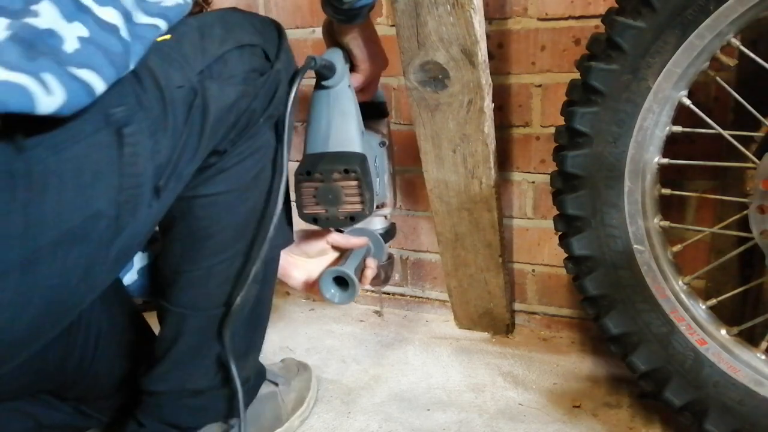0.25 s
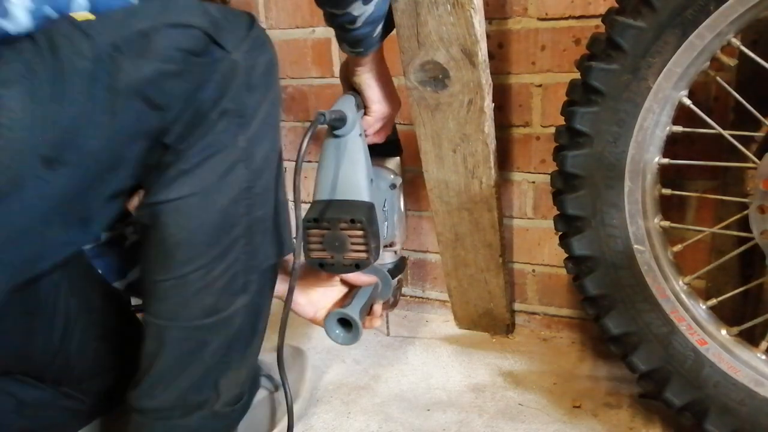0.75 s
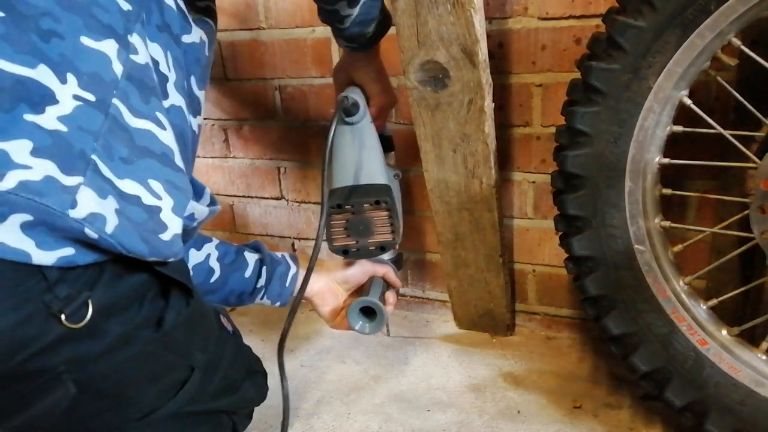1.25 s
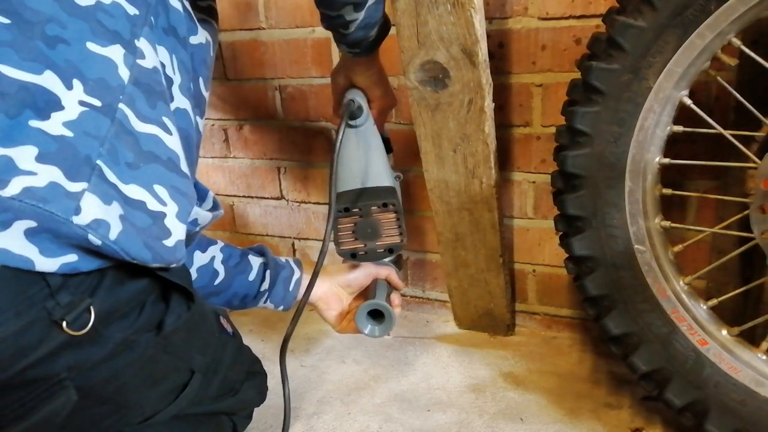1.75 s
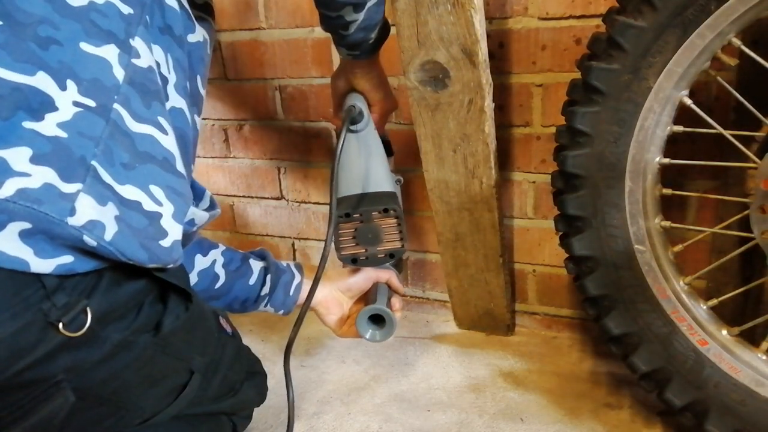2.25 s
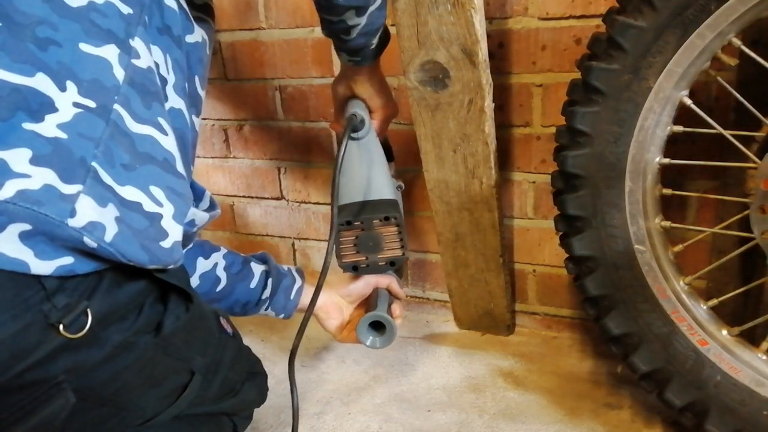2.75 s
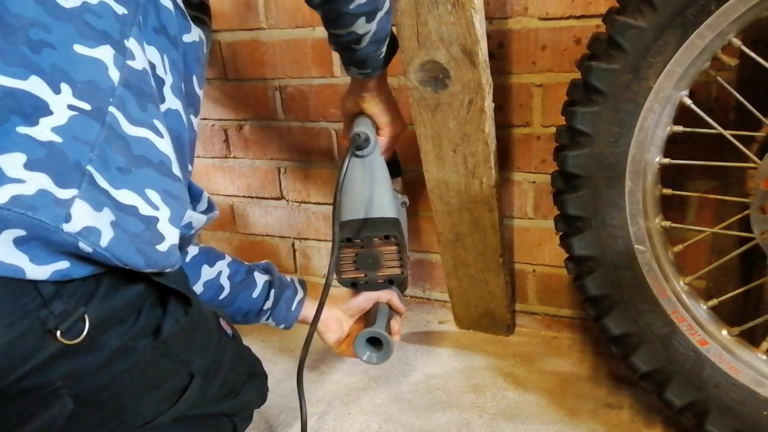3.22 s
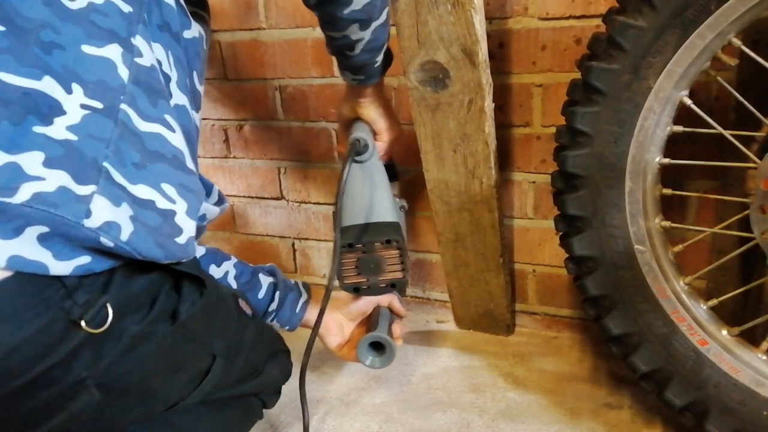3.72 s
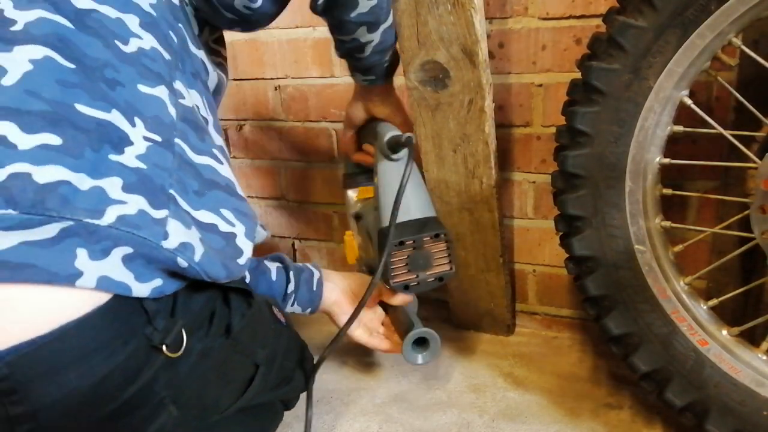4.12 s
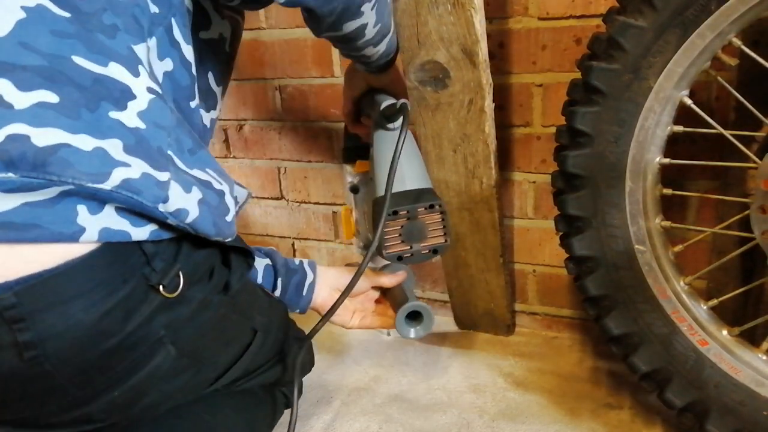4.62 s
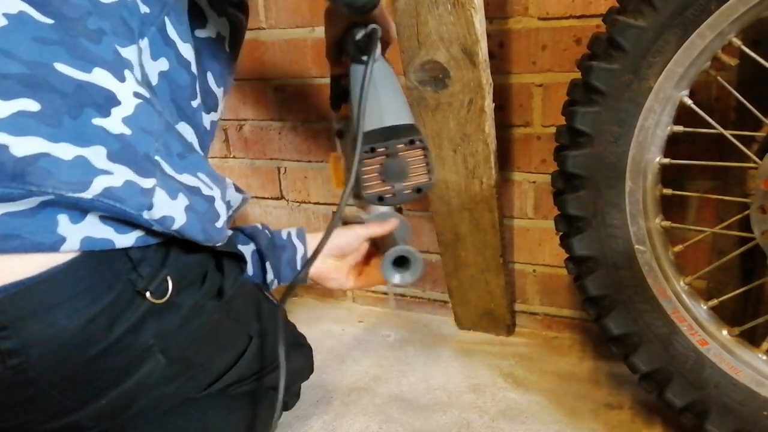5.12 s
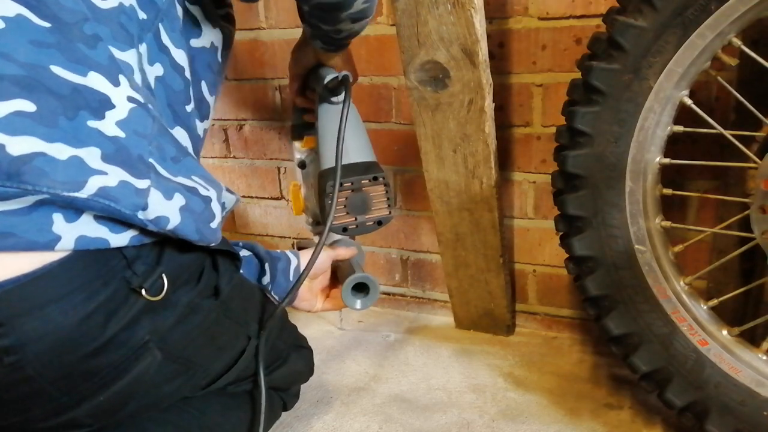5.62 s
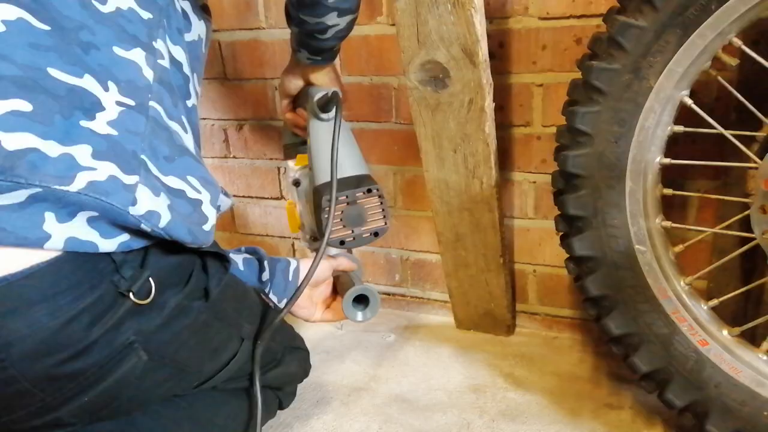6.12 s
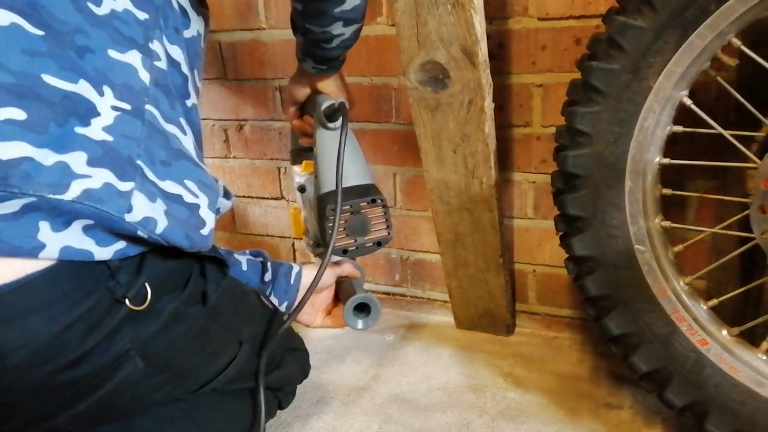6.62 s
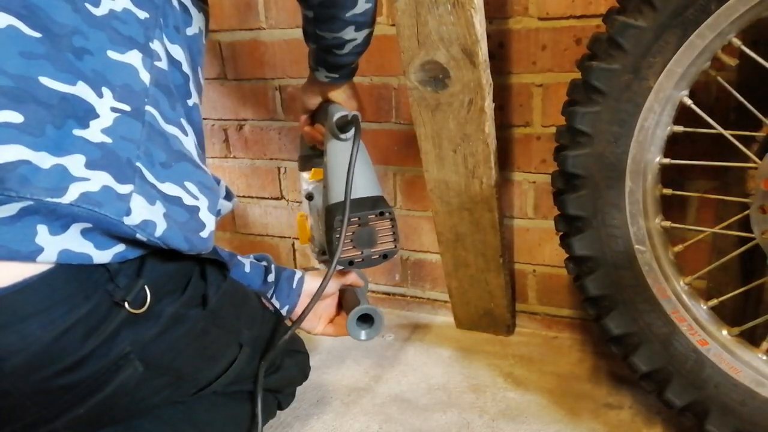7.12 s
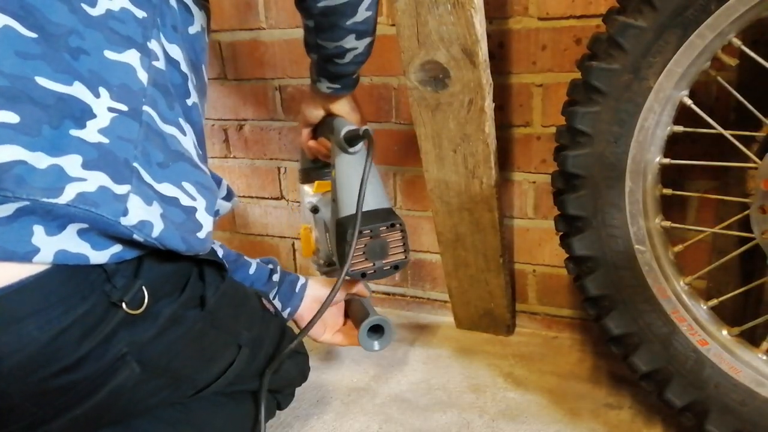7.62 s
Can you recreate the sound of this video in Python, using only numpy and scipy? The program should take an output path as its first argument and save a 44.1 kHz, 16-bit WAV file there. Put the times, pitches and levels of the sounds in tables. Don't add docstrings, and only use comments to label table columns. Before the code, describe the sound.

Cloth rustle and a few knocks on concrete, then a corded hammer drill hammers in short surging pulls, lifts to coast down, and bores again.

```python
import sys
import numpy as np
from scipy import signal
from scipy.fft import rfft, irfft, next_fast_len
from scipy.io import wavfile
from scipy.ndimage import uniform_filter1d, map_coordinates

SR = 44100
rng = np.random.default_rng(int(sys.argv[2]) if len(sys.argv) > 2 else 0)


def boost_factor(decibels):
    exponent = np.asarray(decibels, float) / 20
    return 10 ** exponent


def unload_audio(sound):
    columns = np.transpose(np.atleast_2d(sound))
    steps = np.round(np.clip(columns, -1, 1) * 32767)
    wavfile.write(sys.argv[1], SR, steps.astype(np.int16))


N = 346758


def unit(x):
    return x / np.sqrt(np.mean(x ** 2) + 1e-20)


def along(points, hz):
    f, v = np.transpose(points)
    return np.interp(np.log(hz + 1), np.log(f + 1), v)


def wobble(rate):
    at = np.arange(0, N + 16, 8)
    knots = rng.standard_normal(int(N * rate / SR) + 4)
    return np.interp(np.arange(N), at, map_coordinates(knots, [at * rate / SR]))


def filtered(x, response):
    m = next_fast_len(N + SR // 2)
    return irfft(rfft(x, m) * response(np.fft.rfftfreq(m, 1 / SR)), m)[..., :N]


def causal(x, points):
    cep = irfft(np.log(boost_factor(along(points, np.fft.rfftfreq(4096, 1 / SR))) + 1e-4))
    cep[1:2048] *= 2
    cep[2049:] = 0
    return signal.fftconvolve(x, irfft(np.exp(rfft(cep))))[:N]


def hiss(points):
    return unit(filtered(rng.standard_normal(N), lambda hz: boost_factor(along(points, hz))))


def ringing(hz, peaks):
    f = np.arange(0, 12000, 1.5)
    total = sum(boost_factor(db) * 1j * f * w / (c * c - f * f + 1j * f * w) for c, w, db in peaks)
    return np.interp(hz, f, total)


def dying(x, seconds):
    return signal.lfilter([1], [1, -np.exp(-1 / (seconds * SR))], x)


def stroke_gain(rows):
    t = np.arange(0, N + 40, 20) / SR
    total = sum(boost_factor(db - 20 * np.maximum((s - t) / rise, (t - s) / fall)) for s, rise, fall, db in rows)
    return np.interp(np.arange(N) / SR, t, total)


# (frequency [Hz], level per Hz [dB])
CLOTH = [(710, -40), (1200, -11.5), (1570, -21), (1980, -11), (2870, -3), (4160, -16.5), (7320, -9),
         (8560, -24.5), (11000, -29), (14300, -55), (22000, -120)]
SCUFF = [(290, -76), (500, -46), (739, -19), (1630, -8), (2300, -8), (3600, -18), (5200, -11), (7450, -2),
         (13300, -2), (15800, -4)]
GRIT = [(530, -50), (900, -19), (1220, -10), (1640, -9), (2820, -10.5), (4070, -9.5), (6180, -6.5),
        (7540, -1), (11000, -13), (14300, -40.5), (22000, -120)]
GRIND = [(150, -67), (250, -37), (771, 0), (941, -16), (1340, -6), (1820, -14), (2280, -19), (3500, -34),
         (4550, -64), (7700, -120)]
# (frequency [Hz], level per Hz [dB])
FIZZ = [(5590, -5.5), (9500, 0), (10500, 4), (13000, 18), (13900, 16.5), (15700, 18), (16300, 10)]
VENTS = [(6200, -120), (6700, -14.5), (7300, -3), (7900, -8), (8600, -19), (9000, -120)]
# (loudest [s], 20 dB rise
# [s], 20 dB fall [s], level [dB], fizz over it [dB])
RUSTLES = [(0, .01, .065, -48, -11), (.40, .05, .05, -53, -6), (.435, .07, .095, -46, -25),
           (.745, .05, .006, -70, 9), (.751, .002, .03, -42.5, -1.5), (.77, .01, .3, -61, 2),
           (.852, .006, .03, -48, -1.5), (.885, .0015, .06, -37, 3), (.91, .02, .06, -42, 3),
           (1.016, .004, .05, -56, -15), (1.03, .015, .06, -52, -4), (1.048, .004, .06, -43, -12),
           (1.064, .006, .04, -44, -8), (1.085, .05, .08, -42, -8), (1.11, .03, .05, -45, -15),
           (1.177, .002, .09, -37, -3), (1.207, .001, .008, -50, 20), (1.222, .001, .01, -48, 21),
           (1.24, .001, .01, -45, 21), (5.873, .001, .16, -39, -7), (5.9, .022, .04, -38, -12),
           (5.747, .004, .02, -45, -9), (5.769, .002, .02, -47, -12), (5.79, .01, .2, -63, 0)]
# (loudest [s], 20 dB rise [s], 20 dB fall [s], level [dB])
GRINDS = [
    (.01, .03, .08, -47),
    (.42, .12, .11, -56),
    (.751, .002, .06, -37),
    (.852, .01, .05, -49),
    (.885, .002, .008, -37),
    (.91, .012, .05, -42),
    (.926, .035, .045, -35),
    (.936, .01, .03, -40),
    (5.745, .002, .04, -46),
    (5.769, .002, .1, -51),
]
# (time [s], peak level [dB])
FIRST_BLOWS = [(1.258, -21), (1.28, -20), (1.3044, -24), (1.3324, -25), (1.3643, -27), (1.4042, -23),
               (1.4311, -22)]


def drag():
    t = np.arange(N) / SR
    shoe = np.where(t < 1.046, hiss(VENTS), hiss(SCUFF))
    rubbed = np.select([t < .75, (t > 1) & (t < 1.17)], [hiss(CLOTH), shoe], hiss(GRIT))
    grain = boost_factor(2.6 * wobble(220))
    rub_gain = stroke_gain([row[:4] for row in RUSTLES])
    dust_gain = stroke_gain([(s, rise, fall, db + fizz_db) for s, rise, fall, db, fizz_db in RUSTLES])
    crest_db = 7
    dust_gain += stroke_gain([(s + .001, .001, .011, db - crest_db) for s, db in FIRST_BLOWS])
    return grain * (rub_gain * rubbed + stroke_gain(GRINDS) * hiss(GRIND) + dust_gain * hiss(FIZZ))


# (frequency [Hz], level per Hz [dB])
QUIET = [(76, -51), (130, -17), (176, -6), (248, -11), (304, -7), (437, -13), (579, -14), (1410, -24),
         (4200, -27), (14900, -31), (16200, -33)]
RUMBLE = [(13, -40), (22, -11), (54, -9.5), (81, -9), (110, -12.5), (140, -34.5), (240, -120)]
SEEP = [(3600, -40), (4600, -10), (5400, 0), (7600, -3), (8600, -22), (11000, -120)]
# (time [s], level [dB])
GAIN = [(0, 4), (.15, 0), (.7, -2.5), (.85, -5), (1.5, -18), (4.3, -22), (4.6, -22), (5.6, -13), (6.2, -23),
        (7.86, -22)]


def background():
    t = np.arange(N) / SR
    gain_db = np.interp(t, *np.transpose(GAIN))
    air = boost_factor(-62.5 + gain_db + .5 * wobble(3.4)) * hiss(QUIET)
    shake = boost_factor(-67 + 1.3 * gain_db + 2 * wobble(10)) * hiss(RUMBLE)
    seep = boost_factor(-67) * np.clip((.69 - t) / .15, 0, 1) ** .3 * hiss(SEEP)
    return air + shake + seep


# (time [s], peak level [dB], frequency [Hz], length [s])
STEPS = [
    (.222, -39.5, 58, .12),
    (.549, -43, 150, .025),
    (.598, -46, 150, .025),
    (1.1, -42, 150, .05),
    (5.79, -53, 150, .07),
]
# (time [s], peak level [dB], click level [dB], 60 dB decay [s], click frequency [Hz])
KNOCKS = [(0.341, -54, -56, 0.06, 6370), (0.75, -11, -33, 0.1, 2000), (0.775, -23, -57, 0.052, 2830),
          (0.804, -34.5, -63, 0.18, 2720), (0.851, -40, -46, 0.066, 3480), (0.884, -52, -30, 0.06, 2550),
          (0.984, -46, -52.5, 0.06, 3870), (1.104, -55, -40.5, 0.06, 3700), (1.064, -70, -44, .05, 7700),
          (1.078, -70, -45, .05, 7000), (1.089, -70, -44, .05, 7000), (1.176, -60, -34, .05, 5000),
          (1.404, -60, -36, .05, 9000), (.403, -70, -52, .05, 2340), (.431, -70, -48, .05, 2900),
          (5.872, -65, -38, .05, 4500), (1.198, -28, -27, 0.085, 2840), (5.743, -47, -52, 0.075, 8700),
          (5.767, -29, -44, 0.079, 8473), (5.79, -31, -62, 0.055, 8480), (5.829, -42, -60, 0.078, 3246)]
# (frequency [Hz], level per Hz [dB])
HOLLOW = [(53, -57), (90, -29.5), (197, 0.5), (449, -12), (601, -5), (1060, -36), (1460, -24),
          (2910, -37.5), (3500, -56), (4550, -81.5), (7700, -120)]


def knocks():
    low, out = np.zeros(N + SR), np.zeros(N + SR)
    t = np.arange(SR // 4) / SR
    for s, db, click_db, t60, hz in KNOCKS:
        at = round(s * SR)
        rattle, tick = rng.standard_normal((2, len(t)))
        rattle[0] = 7
        low[at:][:len(t)] += boost_factor(db + 11.5 - 60 * t / t60) * rattle
        click = signal.lfilter(*signal.iirpeak(hz, 1.6, SR), tick)
        out[at:][:len(t)] += click * boost_factor(click_db + 11.5 - 60 * t / .026)
    for s, db, hz, length in STEPS:
        swell = (1 - np.exp(-t / .004)) * np.exp(-(t / length) ** 2 * 1.5)
        out[round(s * SR):][:len(t)] += boost_factor(db) * swell * np.sin(2 * np.pi * hz * t)
    return out[:N] + causal(low[:N], HOLLOW)


HALT = 16.5
# (from [s], to [s])
LIFTED = (4.378, 5.872)
# (time [s], held [s], speed aimed at [blows/s], pressure on the bit [dB], squeal over the motor [dB])
PULLS = [(1.176, .075, 55, 4, -20), (1.408, .092, 74, 2.5, -7), (1.64, .072, 82, 1.5, -5),
         (1.843, .075, 109, .3, -2), (2.065, .12, 119, -1.3, -4), (2.335, .12, 121, -.7, -5),
         (2.555, .165, 137, .3, -5), (2.86, .145, 137, -.3, -6), (3.11, .265, 139, .3, -6),
         (3.555, .155, 135, .7, -5), (3.81, .125, 131, -.7, -9), (4.19, .087, 89, -2.5, -1.5),
         (4.33, .092, 139, -3.5, -1.5), (4.50, .068, 142, .3, -7), (4.81, .06, 131, .3, -3),
         (5.872, .056, 69, -1.5, -3), (6.03, .1, 101, -2.2, -4), (6.262, .13, 137, -.7, -6),
         (6.60, .12, 98, -1.3, -3.5), (6.84, .08, 113, .3, -3), (6.99, .105, 126, 1, -4),
         (7.205, .11, 127, 1.5, -5), (7.46, .15, 108, -1.3, -1), (7.675, .08, 120, -.7, -1)]


def throttle():
    kick, spin_up_s = 36, .125
    t = np.arange(N + 1) / SR
    sag_s = np.where((t > LIFTED[0]) & (t < LIFTED[1]), .38, .3)
    speed = np.full(N + 1, HALT)
    current, lag, press_db = np.zeros((3, N + 1))
    starts = [round(row[0] * SR) for row in PULLS]
    for (s, held, aim, db, _), i, j in zip(PULLS, starts, starts[1:] + [N]):
        part = slice(i, j + 1)
        age = np.abs(t[part] - s)
        start = max(speed[i], kick)
        climb_left = np.maximum(1 - age / min(held, spin_up_s), 0) ** 1.5
        up = aim + (start - aim) * climb_left
        speed[part] = up * np.exp(-np.cumsum((age > held) / sag_s[part] / SR))
        flowing = 1 - (1 - current[i]) * np.exp(-age / .022)
        current[part] = flowing * np.exp(-np.maximum(age - held, 0) / .055)
        lag[part] = (aim - up) / aim
        press_db[part] = db
    return speed[:N], current[:N], lag[:N], uniform_filter1d(press_db[:N], size=900)


def trigger():
    late_s = .016
    out, t = np.zeros(N + SR, complex), np.arange(SR // 8) / SR
    for s, *_, db in PULLS:
        hz = 7900 - 3100 * np.exp(-t / .03)
        swell = (1 - np.exp(-t / .006)) * np.exp(-(t / .05) ** 2)
        squeal = boost_factor(db) * swell * np.exp(2j * np.pi * np.cumsum(hz) / SR)
        out[round((s + late_s) * SR):][:len(t)] += squeal
    return (out[:N] * boost_factor(2.5 + 1.2 * wobble(120)) * np.exp(1.5j * wobble(500))).real


def loudness(law, speed, current, lag, press_db, free):
    top_db, halving_db, current_db, surge_db, stall_db, stall_free_db, free_db, share = law
    full, stall_speed = 145, 40
    drive = current * (current_db * np.maximum(1 - speed / full, 0) + surge_db * lag) + share * press_db
    stall = np.where(free, stall_free_db, stall_db) * (stall_speed / speed) ** 2.2
    stall += 11 * (HALT / speed) ** 6.5
    lifted_db = free_db * uniform_filter1d(free * 1., size=400)
    return top_db + halving_db * np.log2(speed / full) + drive - stall + lifted_db


def strikes(turns, slack):
    stroke = turns + (.004 + .048 * slack) * wobble(110)
    at = np.flatnonzero(np.diff(np.floor(stroke)) > 0)
    blows = np.zeros(N)
    blows[at] = boost_factor(np.clip(rng.standard_normal(len(at)), -3, 1.2) * (1.3 + .4 * slack[at]))
    return blows


# (frequency [Hz], width [Hz], level [dB])
SLAB = [(151, 11, 2), (182, 11, 9), (214, 20, 9), (301, 74, -11), (410, 18, 8), (516, 30, 5), (558, 20, 4),
        (630, 18, 12.5), (760, 20, 14), (899, 30, 14.5), (978, 30, 11), (1199, 14, 14.5), (1420, 23, 14.5),
        (1486, 20, 12), (1570, 9, 13.5), (1820, 35, 8.5), (2128, 25, 11), (2320, 30, 13), (2470, 40, 8),
        (2566, 27, 12)]
# (frequency [Hz], width [Hz], depth [0-1])
NOTCHES = [(165, 6, .5), (200, 5, .5), (330, 8, .5), (375, 12, .75), (475, 18, .55), (1065, 40, .65),
           (1270, 30, .5), (1530, 20, .85), (1680, 16, .55), (1970, 45, .55), (2375, 22, .5)]


def slab(hz):
    cancel = np.prod([1 - depth * np.exp(-((hz - c) / w) ** 2) for c, w, depth in NOTCHES], axis=0)
    return (np.minimum(hz / 125, 1) ** 6 * 1.3 + .6 * ringing(hz, SLAB)) * cancel


# (frequency [Hz], level per Hz [dB])
THUD = [(53, -40), (90, -13), (200, -6.5), (330, -5), (568, -1.5), (831, -3.5), (1430, -8), (1670, -2),
        (4000, -21.5), (5200, -33), (8800, -120)]


def hammering(blows, burst, speed, slack, loaded):
    blow = (1 - .4 * slack ** 2) * unit(blows / np.sqrt(speed))
    crush = .5 * (.3 + .75 * slack + .8 * slack ** 3) * (.95 + .5 * burst) * rng.standard_normal(N)
    spread = 1.3
    struck = filtered(causal(blow + crush, THUD), lambda hz: np.exp(-1j * spread * np.sqrt(hz)))
    grip = np.pi / 4 * (1 + np.tanh(wobble(9) - 1))
    first = filtered(np.cos(grip) * struck, slab)
    second = filtered(np.sin(grip) * struck, lambda hz: slab(hz * 1.025))
    keep = np.exp(-1 / (.016 * SR))
    return unit(first + second) * signal.lfilter([1 - keep], [1, -keep], loaded) ** 2


# (frequency [Hz], level per Hz [dB])
MOTOR = [(60, -69), (140, -29), (400, -33), (700, -11.5), (1000, -11), (1340, -4.5), (2100, -5), (2800, -4),
         (4000, -5.5), (5800, -4), (7400, -5), (8500, -4), (11000, -16.5), (14300, -40.5), (22000, -120)]
# (frequency [Hz], width [Hz], level [dB])
CASING = [(2300, 120, -12), (2570, 23, -4), (2950, 49, -3), (3140, 36, -3), (3470, 25, -3), (3710, 65, -5),
          (4100, 200, -8), (5050, 300, -8), (5570, 53, -4), (6340, 64, -6), (7100, 150, -5), (7310, 35, 0),
          (8400, 200, -8)]


def brushes(burst, crack, slack):
    noise = filtered(hiss(MOTOR), lambda hz: .75 + .5 * slab(hz) + boost_factor(1) * ringing(hz, CASING))
    return unit(noise * (1 + .35 * burst + .3 * slack * crack) * boost_factor(.9 * wobble(40)))


def chips(crack, slack):
    return unit(hiss(FIZZ) * (1 + (.6 + 1.4 * slack) * crack) * boost_factor(.87 * wobble(60)))


GEAR = 5.2
# (multiple of the shaft [ratio], level under the motor [dB])
BARS = [(15, -11.5), (17.5, -14), (20, -11), (24, -13), (30, -17), (42, -5)]
# (frequency [Hz], width [Hz])
BAR_WINDOWS = [(4700, 450), (7500, 800)]


def commutator(speed, turns, free):
    awake = np.clip(speed / 30 - .75, 0, 1)
    song = np.zeros(N)
    for k, db in BARS:
        tone = np.sin(2 * np.pi * k * GEAR * turns + .9 * wobble(90))
        song += boost_factor(db + 4 * wobble(18)) * tone * awake * (k * GEAR * speed < 9000)
    return filtered(free * song, lambda hz: sum(np.exp(-((hz - c) / w) ** 2) for c, w in BAR_WINDOWS))


def shaft(speed, turns, free):
    unbalance = (speed / 140) ** 2.1 * boost_factor(-15.5 + 2.5 * wobble(30)) * free
    rotor = np.sin(2 * np.pi * GEAR * turns + .6 * wobble(60))
    idler = boost_factor(-15) * np.sin(2 * np.pi * .72 * GEAR * turns + .6 * wobble(60))
    return unbalance * (rotor + idler)


def vents(speed, loaded):
    return hiss(VENTS) * boost_factor(-8 + 2.2 * wobble(30)) * (speed / 140) ** .8 * (1.2 - .65 * loaded)


# (flat out [dB], per speed doubling [dB], current at rest [dB], surge [dB],
#              stall loss boring [dB], stall loss free [dB], when free [dB], share of pressure [ratio])
THUD_LAW = (-41.3, 1.8, 8.5, .5, 3, 5, -50, 1.1)
MOTOR_LAW = (-37.2, 4.2, 7.5, 5, .7, 3.4, 1.7, .55)
FIZZ_LAW = (-33, 8.3, 11, 4, .3, 3, 1.2, 1.05)
# (frequency [Hz], level [dB])
SECOND_HOLE = [(1600, 0), (1830, -3), (2300, 1), (2750, -1.5), (4100, -1.5), (5100, 1), (5700, -2),
               (6600, -2.5), (7200, -1), (7800, 1), (8300, -2.5), (9500, 0)]


def drill():
    speed, current, lag, press_db = throttle()
    t = np.arange(N) / SR
    on, free = t >= PULLS[0][0], (t > LIFTED[0]) & (t < LIFTED[1])
    loaded = on & ~free
    state = speed, current, lag, press_db, free
    thud_gain = boost_factor(loudness(THUD_LAW, *state) + 1.08)
    motor_gain = boost_factor(loudness(MOTOR_LAW, *state) + 1.06)
    fizz_gain = boost_factor(loudness(FIZZ_LAW, *state))
    speed = uniform_filter1d(speed, size=900)
    turns = np.cumsum(speed) / SR
    slack = np.clip((142 - speed) / 62, .05, 1)
    blows = strikes(turns, slack)
    burst = dying(blows, .0048) * loaded
    crack = dying(blows, .0012) * loaded
    motor = brushes(burst, crack, slack) + commutator(speed, turns, free) + shaft(speed, turns, free)
    motor += vents(speed, loaded) + trigger()
    thud = hammering(blows, burst, speed, slack, loaded)
    tool = on * (thud_gain * thud + motor_gain * motor + fizz_gain * chips(crack, slack))
    turned = filtered(tool, lambda hz: boost_factor(along(SECOND_HOLE, hz)))
    tool = np.where(t < LIFTED[1], tool, turned)
    return filtered(tool, lambda hz: np.minimum(hz / 125, 1) ** 8.5)


# (frequency [Hz], likeness [0-1])
ALIKE = [(60, .93), (150, .96), (380, 0.86), (700, 0.89), (1100, 0.84), (2380, 0.52), (5980, 0.33),
         (9500, 0.36), (13000, 0.91)]
# (frequency [Hz], level [dB])
LEAN = [(40, -7), (150, -6.5), (380, -3), (950, -1), (2380, -1.5), (5980, -3.2), (12000, -5), (15000, -6)]


def scene():
    near = drag() + background() + knocks() + drill()
    z = signal.stft(near, nperseg=128)[2]
    scattered = z * np.exp(2j * np.pi * rng.random(z.shape))
    far = unit(signal.istft(scattered, nperseg=128)[1][:N]) * near.std()

    def turn(hz):
        return np.arccos(np.clip(along(ALIKE, hz), -1, 1)) / 2

    mid = filtered(near, lambda hz: np.cos(turn(hz)))
    side = filtered(far, lambda hz: np.sin(turn(hz)))
    ports = np.array([mid + side, mid - side])
    return filtered(ports, lambda hz: boost_factor(np.outer([.5, -.5], along(LEAN, hz))))


def band_limit(x):
    return signal.sosfilt(signal.butter(12, 16980, fs=SR, output="sos"), x)


def record(dry):
    limited = dry / (1 + np.abs(dry / .3) ** 4) ** (1 / 4)
    return band_limit(filtered(limited, lambda hz: hz < 15930))


dry = scene()
out = record(dry)
unload_audio(out)
```